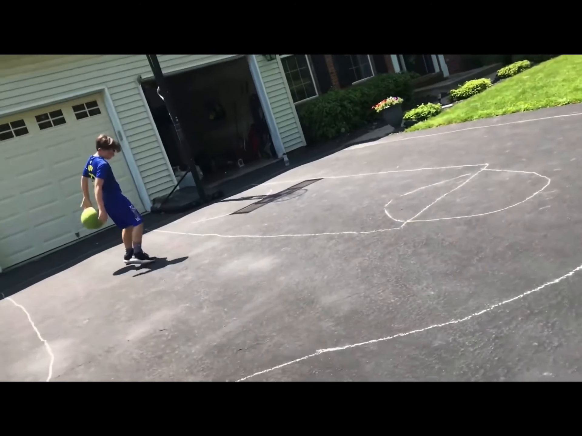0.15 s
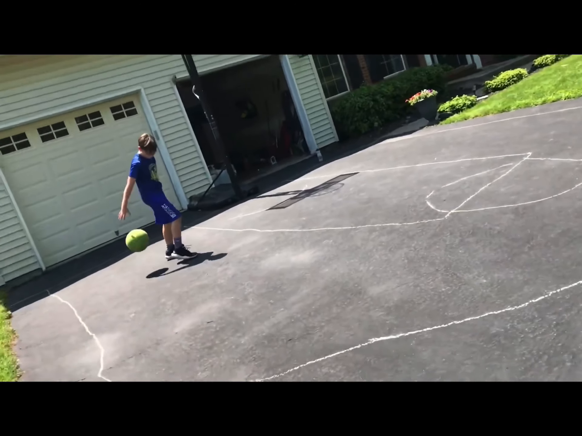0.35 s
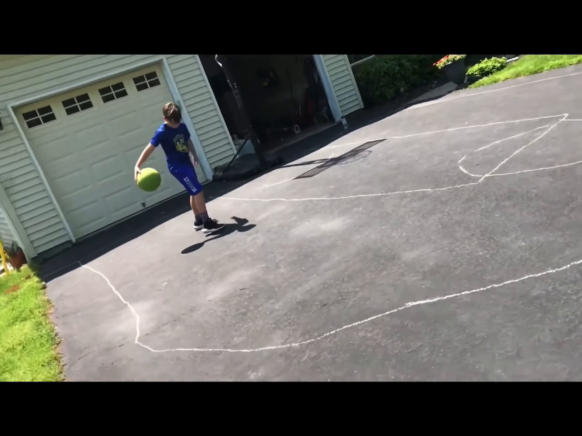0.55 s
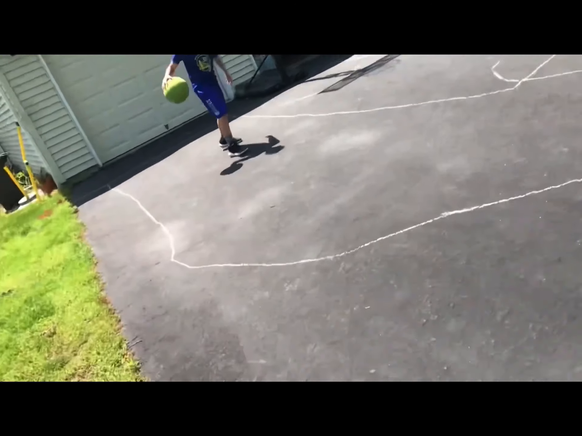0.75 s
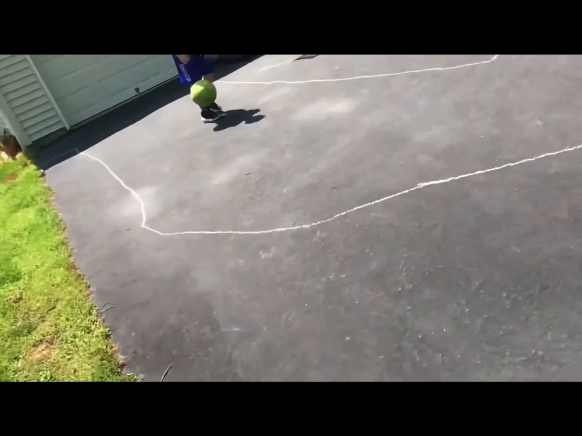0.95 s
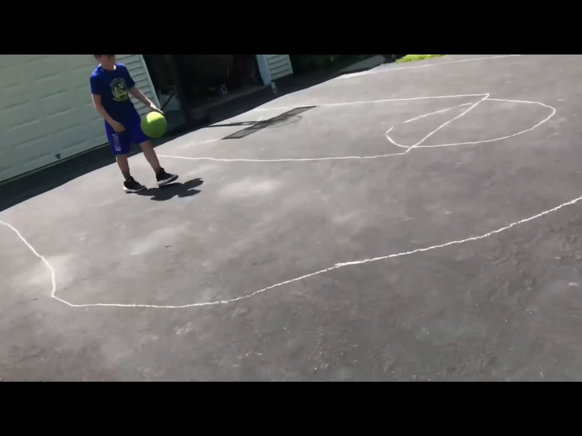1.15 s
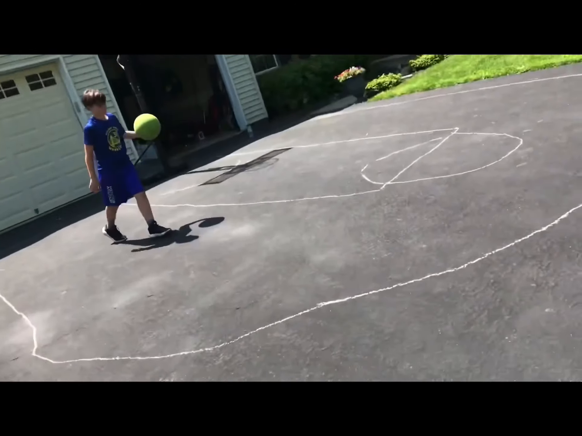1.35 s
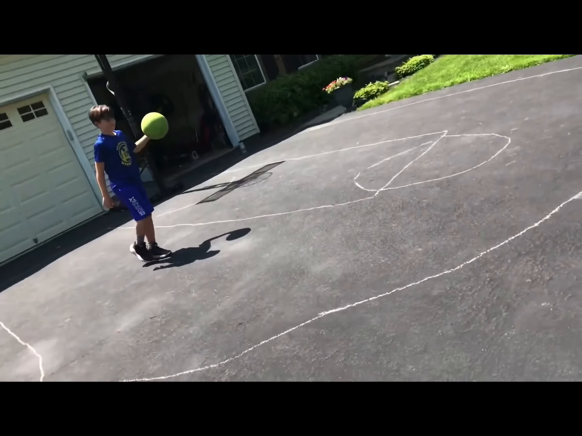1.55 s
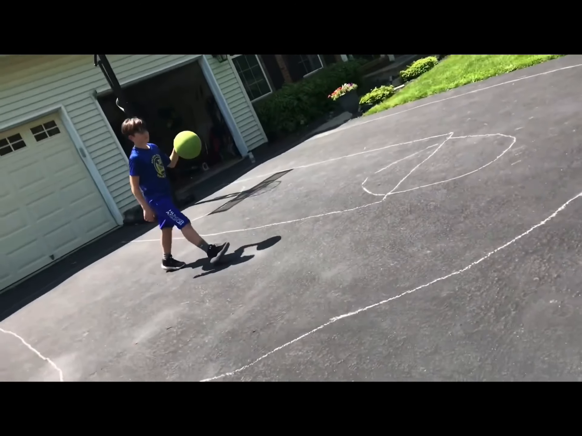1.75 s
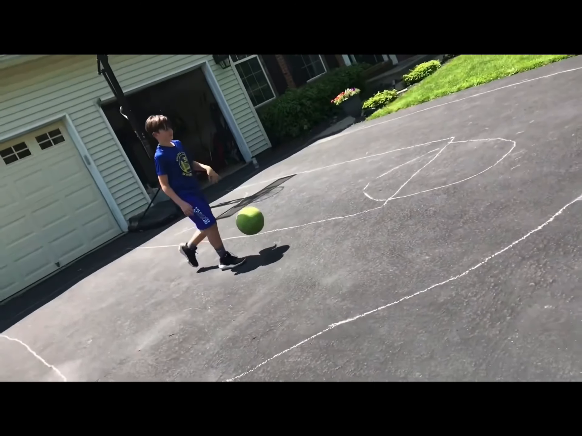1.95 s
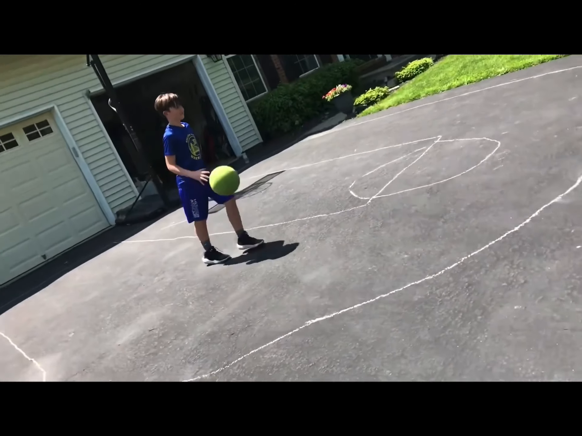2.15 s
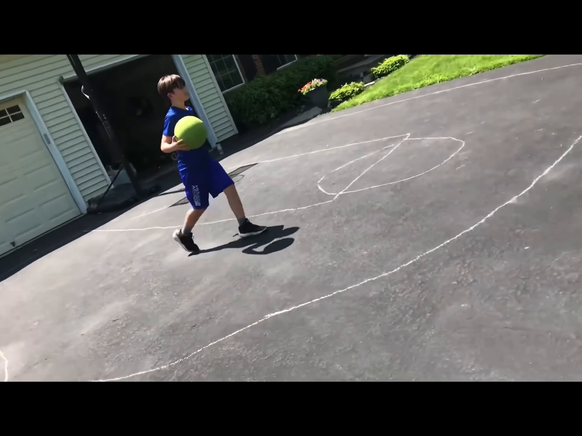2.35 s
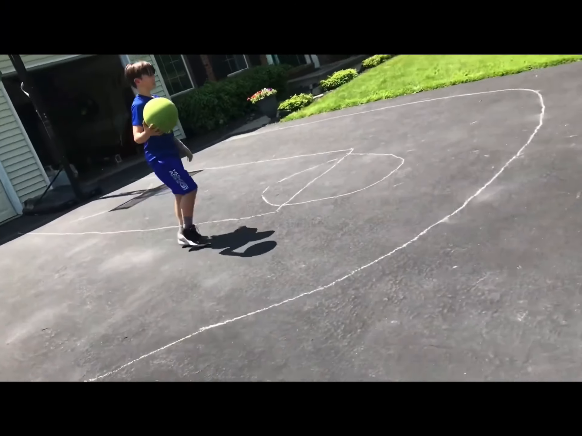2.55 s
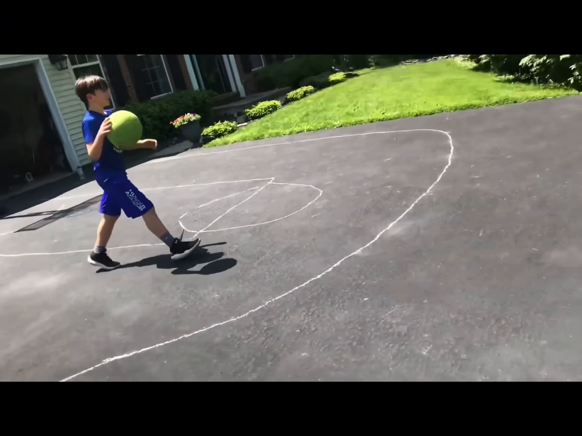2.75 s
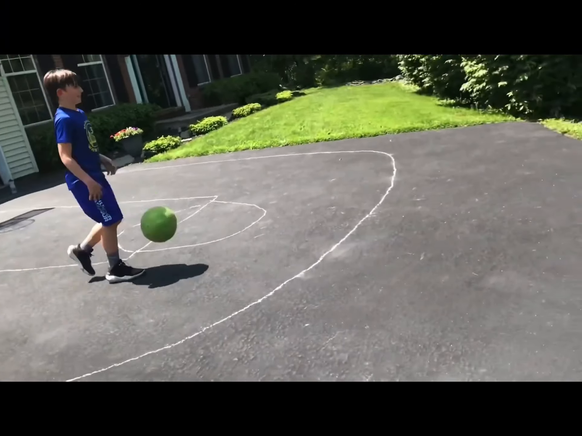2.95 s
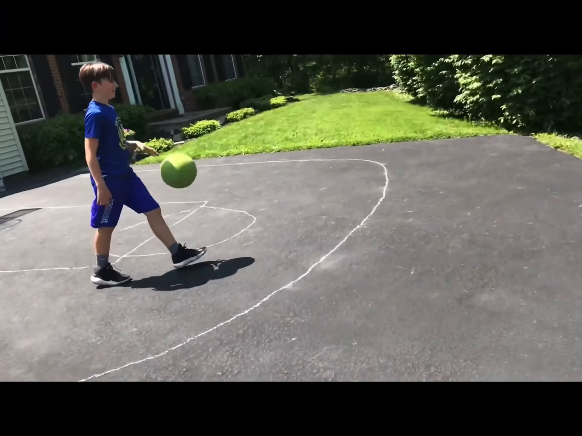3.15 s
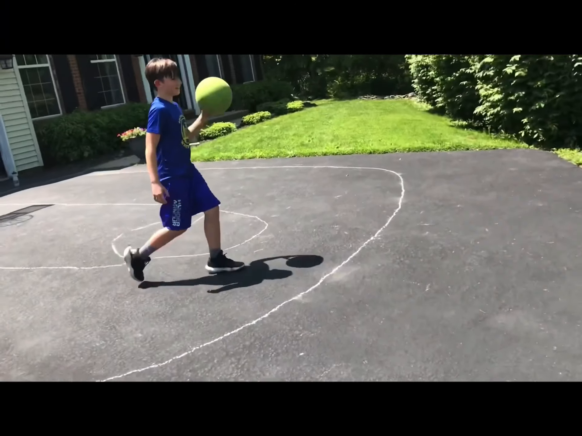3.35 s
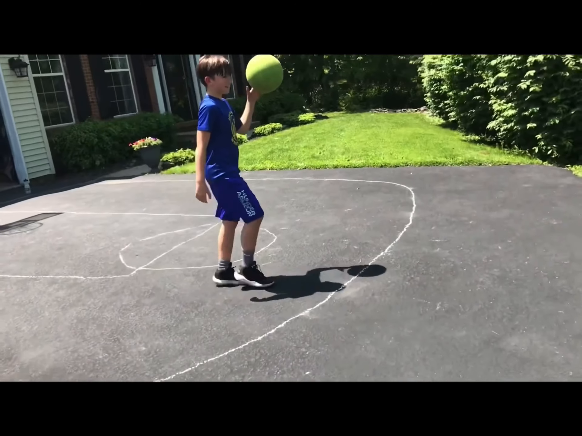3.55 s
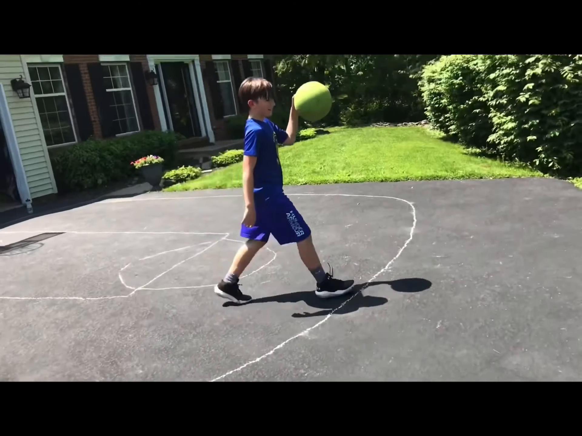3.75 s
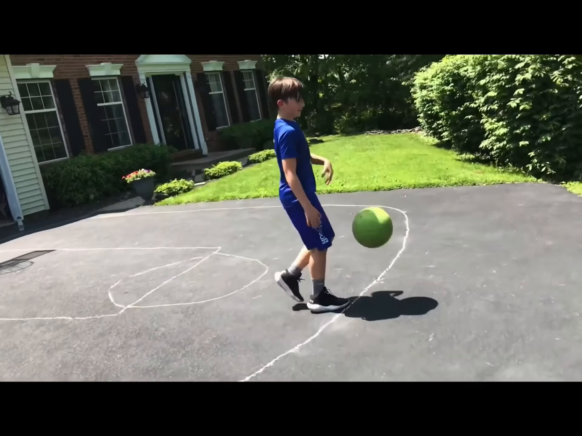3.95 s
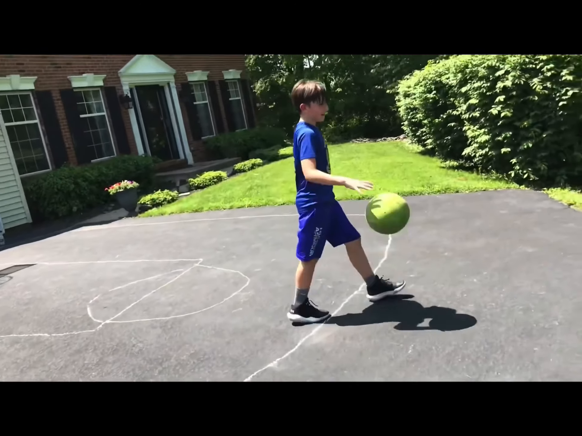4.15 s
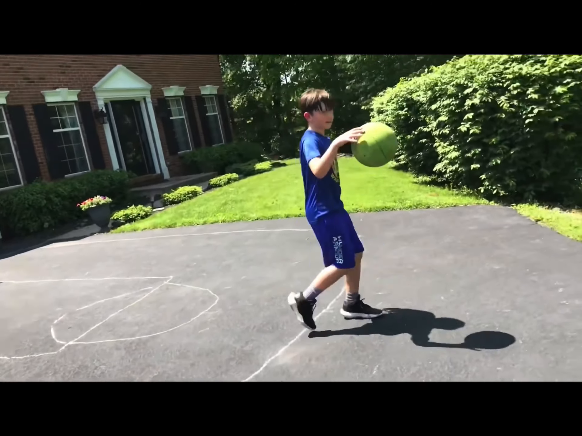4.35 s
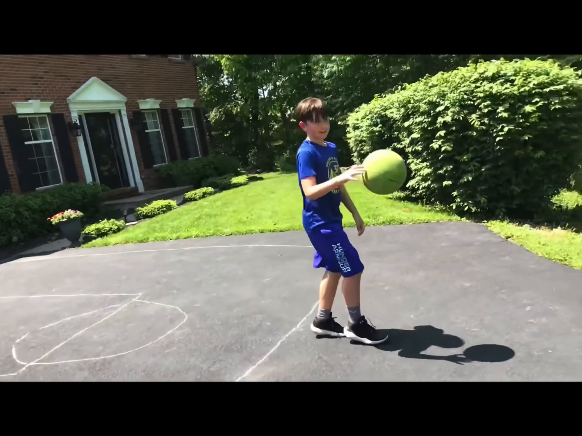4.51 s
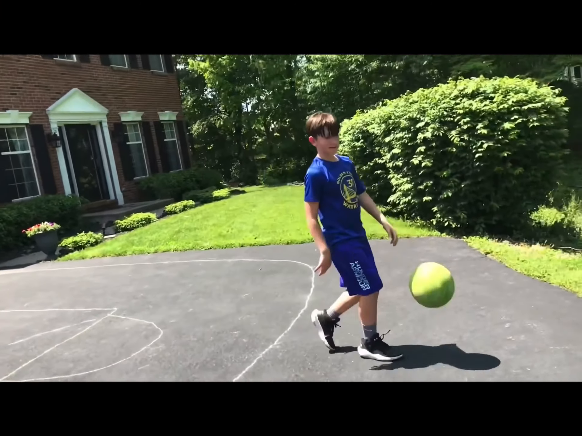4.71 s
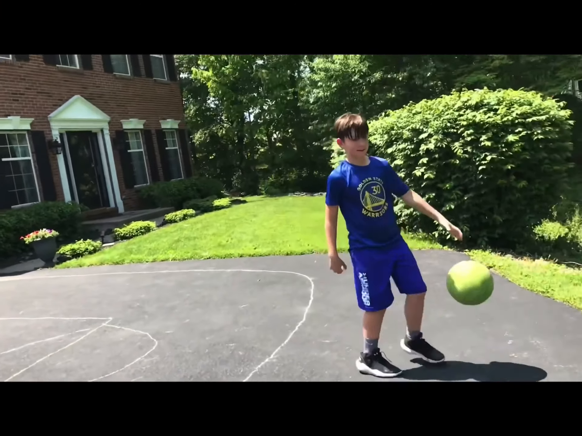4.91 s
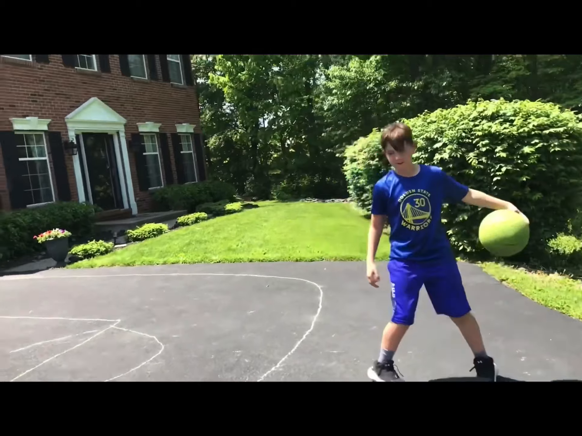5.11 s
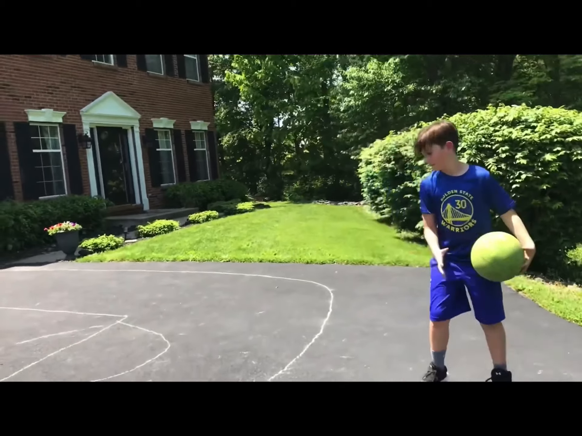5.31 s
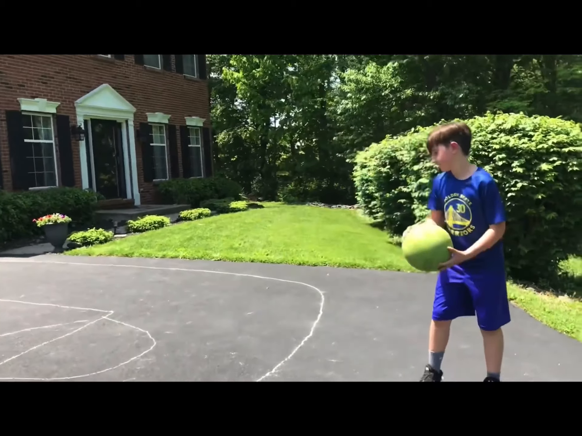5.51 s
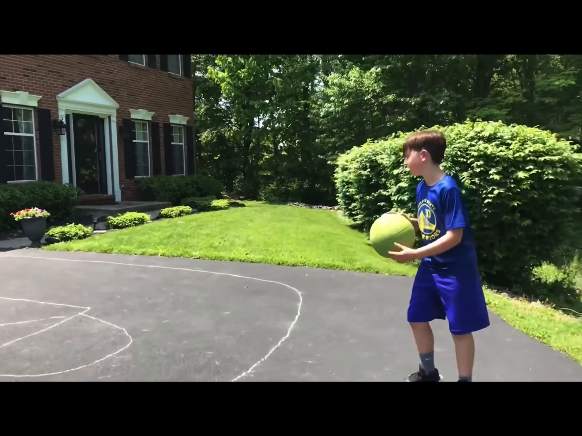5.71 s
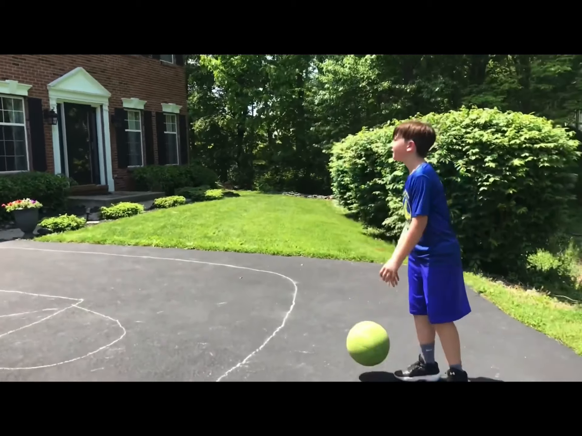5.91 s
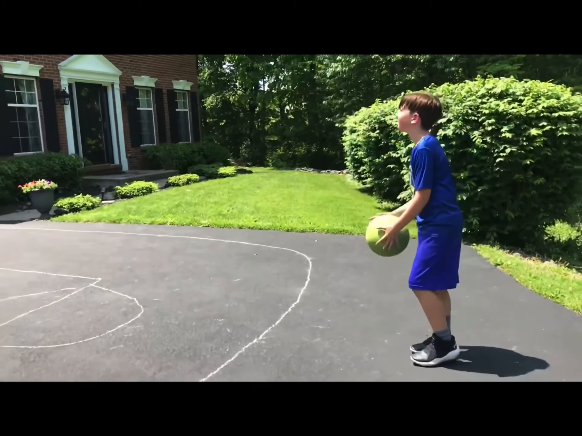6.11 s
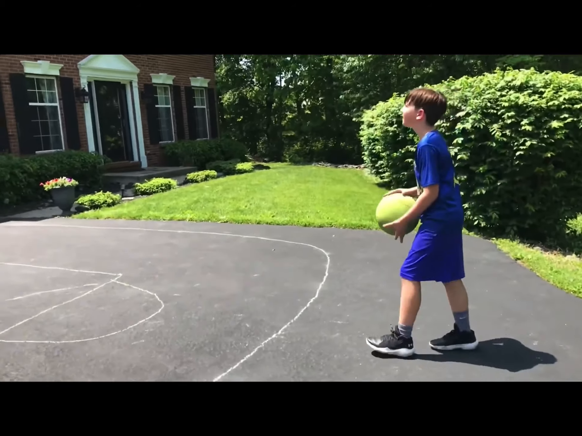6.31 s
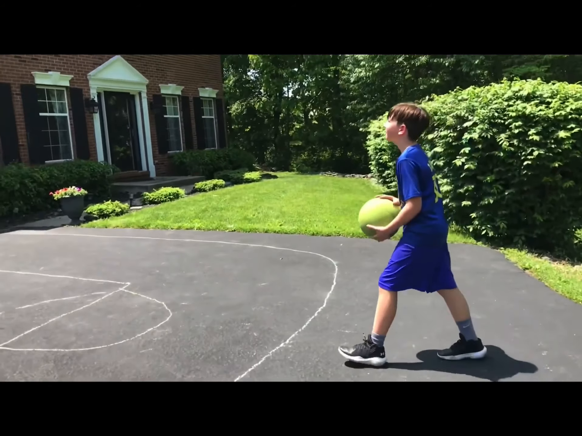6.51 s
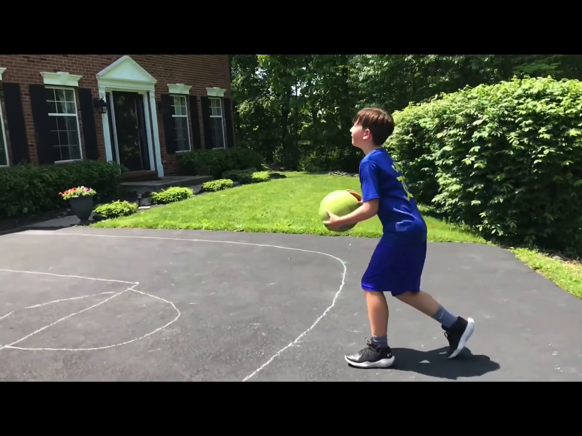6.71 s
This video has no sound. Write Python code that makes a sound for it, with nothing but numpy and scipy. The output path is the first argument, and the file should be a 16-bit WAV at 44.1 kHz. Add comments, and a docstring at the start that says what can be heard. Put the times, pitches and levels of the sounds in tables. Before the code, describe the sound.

A child dribbles a rubber ball on an asphalt driveway, walking toward a hand-held phone. Seven springy bounces, roughly a second apart, start soft and grow louder, each a deep thump with a hollow ping and gritty slap, echoing off walls. Between them come dull shoe thuds, small clicks, brushing and palm touches. Faint bird slurs, low outdoor rumble, leaf hiss and a weak hum lie behind.

```python
"""First heard is a rubber ball, dribbled by a child over asphalt and coming closer to a hand-held phone.
Each bounce sums a modal thump of the squashed ball, a ping of its air and shell and a noise crack of the grit.
Garage and house return delayed echoes; the yard scatters a diffuse tail of decaying noise bands.
Between bounces: palms ring the ball, soles and hands thud, click and brush, and air puffs buffet the microphone.
Behind lie a songbird's gliding tone, a faint machine hum and the filtered noise of outdoor rumble and hiss."""
import sys
import numpy as np
from scipy import signal
from scipy.fft import rfft, irfft, next_fast_len
from scipy.io import wavfile

SR = 44100
rng = np.random.default_rng(int(sys.argv[2]) if len(sys.argv) > 2 else 0)


def int16_out(signal):
    """Quantize to a 16-bit WAV file."""
    q = np.round(np.clip(np.atleast_2d(signal).T, -1, 1) * 32767)
    wavfile.write(sys.argv[1], SR, q.astype(np.int16))


N = 298545
SIZE = 16384  # samples in one short sound
AGE = np.arange(SIZE) / SR  # s since its onset
TIME = np.arange(N) / SR  # s since the start of the scene


def amp(db):
    """Level to gain: 20 dB is a factor of ten in amplitude."""
    return 10 ** (np.asarray(db) / 20)


def peak(x, db):
    """Peak normalisation to a level in dB."""
    return x * amp(db) / np.abs(x).max()


def unit(x):
    """Power normalisation to an rms of 1."""
    return x / np.sqrt(np.mean(x ** 2))


def add(track, s, x):
    """Superposition: mix a sound in at a time in s."""
    start = max(0, int(round(s * SR)))
    track[start:start + len(x)] += x[:N - start]


def fade(t60, age=AGE):
    """Exponential decay, falling 60 dB in t60 seconds."""
    return np.exp(-np.log(1000) * age / t60)


def noise(size=SIZE):
    """White noise: equal mean power at all frequencies."""
    return rng.standard_normal(size)


def butter(x, hz, kind, order):
    """Maximally flat filtering: low-pass, high-pass or band-pass."""
    return signal.sosfilt(signal.butter(order, hz, kind, fs=SR, output="sos"), x)


def band(x, hz, octaves):
    """Gentle band-pass filtering about a centre frequency."""
    edges = np.clip([hz / 2 ** (octaves / 2), hz * 2 ** (octaves / 2)], 1, SR / 2 - 1)
    return butter(x, edges, "band", order=2)


def colour(x, points):
    """Minimum-phase filtering through (frequency [Hz], gain [dB]) points."""
    size = next_fast_len(len(x) + SIZE, True) // 2 * 2
    hz, db = np.transpose(points)
    bins = np.maximum(np.fft.rfftfreq(size, 1 / SR), 1)
    cepstrum = irfft(np.log(amp(np.interp(np.log(bins), np.log(hz), db))))
    # folding the cepstrum onto positive times makes the filter causal
    cepstrum[1:size // 2] *= 2
    cepstrum[size // 2 + 1:] = 0
    return irfft(rfft(x, size) * np.exp(rfft(cepstrum)))[:len(x)]


def walk(rate):
    """Random modulation: smooth drift of rms 1 through `rate` random values per second."""
    knots = noise(int(N / SR * rate) + 2)
    return unit(np.interp(TIME * rate, np.arange(len(knots)), knots))


def ring(modes, scatter_db=3.0):
    """Modal superposition: damped sines of alternating sign, a little different at every blow."""
    total = 0
    for k, (hz, db, t60) in enumerate(modes):
        level_chance, pitch_chance = rng.standard_normal(2)
        tone = np.sin(2 * np.pi * hz * (1 + 0.013 * pitch_chance) * AGE)
        total = total + (-1) ** k * amp(db + scatter_db * level_chance) * fade(t60) * tone
    return total


def swell(grains, length, db):
    """Amplitude modulation: noise of a given rms level rises and falls once, as a half-sine."""
    return amp(db) * unit(grains) * np.sin(np.pi * np.minimum(AGE / length, 1))


# Bounces of the ball: (time [s], thump peak [dB], gain of thump modes above the main one [dB],
# ping peak [dB], favoured ping frequency [Hz], lift-off gain [dB], relative crack level [dB],
# crack tilt [dB per octave], gain of yard tail and after-ring [dB])
DRIBBLED_BOUNCES = [(0.389, -17.3, -2.5, -27.5, 900, -0.5, -15.5, -1, -3),
                    (1.0762, -16.2, 3, -17, 910, -4.5, -13, -0.9, 0),
                    (2.0753, -13, 4, -13.5, 1070, -26, -12, 1.7, 1),
                    (3.0770, -12, 3.5, -16, 1200, -7, -11, -0.2, 4),
                    (4.0990, -9, 3, -14.5, 1130, -5.5, -5.5, -0.1, 7.5),
                    (4.8757, -11, 9, -13.5, 1060, -5, -16, 1.1, -0.5),
                    (6.0174, -13, -3, -13.5, 840, -7.5, -15, 2.6, -3.5)]
# Spectrum a bounce radiates in all directions together: (frequency [Hz], gain [dB])
RADIATED_SPECTRUM = [(30, -8), (60, 34), (110, 28), (200, 21.5), (450, 8), (1100, 16.5), (1800, 5.5),
                     (2700, 6), (5000, -1.5), (7000, -8), (16000, -22.5)]
CONTACT_S, CONTACT_S_PER_DB = .0098, .0001  # a blow that shakes the shell harder leaves the ground sooner


def dribble():
    """Superposition of direct sound, after-ring, wall reflections and diffuse yard tail at every bounce."""
    out = np.zeros(N)
    radiated = colour(signal.unit_impulse(SIZE), RADIATED_SPECTRUM)
    for s, thump_db, wobble_db, ping_db, ping_hz, lift_db, crack_db, tilt_db, tail_db in DRIBBLED_BOUNCES:
        contact_s = CONTACT_S - CONTACT_S_PER_DB * wobble_db
        sound = bounce(contact_s, thump_db, wobble_db, ping_db, ping_hz, lift_db, crack_db, tilt_db)
        add(out, s, sound)
        add(out, s, after_ring(tail_db))
        add(out, s, amp(tail_db) * yard(radiated))
        out += echoes(s, sound)
    return out


# Deep modes of the squashed ball: (nominal frequency [Hz], relative level [dB], t60 [s])
SQUASHED_MODES = [(154.3, 0, 0.059), (70.6, -7, 0.051), (203.5, -12.5, 0.05), (273.5, -8, 0.07),
                  (321.4, -14, 0.08)]
# Air and shell modes of the ball at a bounce: (nominal frequency [Hz], relative level [dB], t60 [s])
BALL_MODES = [(348, -7, 0.12), (588, -13, 0.058), (653, 3, 0.037), (757, 1, 0.033), (886, -3.5, 0.04),
              (927, -4, 0.05), (1022, -3, 0.029), (1153.6, -1, 0.047), (1274, 4, 0.02), (1343, -2, 0.027),
              (1476, -2, 0.025), (1774, -16.5, 0.085), (2265, -21, 0.0486), (2760, -3, 0.0162),
              (2806, -9.5, 0.0209)]
# Spectrum of rubber slapping asphalt, before tilt: (frequency [Hz], gain [dB])
CRACK_SPECTRUM = [(200, -16), (380, 3.5), (900, 4), (1400, 1.5), (1900, -4), (2600, 7), (3400, -5),
                  (5200, 1), (6200, -8.5), (7200, -9), (9700, -14.5), (12000, -11), (16000, -25)]


def bounce(contact_s, thump_db, wobble_db, ping_db, ping_hz, lift_db, crack_db, tilt_db):
    """Impact excitation: a brief contact force drives the ball's modes, while rubber slaps the grit."""
    squash = np.cos(np.pi * AGE / contact_s) * (AGE < contact_s)  # rate of change of a half-sine force
    # a slanting blow stirs the modes above the main one
    main_hz = SQUASHED_MODES[0][0]
    deep_modes = [(hz, db + wobble_db * (hz > main_hz), t60) for hz, db, t60 in SQUASHED_MODES]
    swing = signal.fftconvolve(squash, ring(deep_modes, scatter_db=2.0))[:SIZE]
    # the shrinking ball also draws the air in
    drawn_air = amp(-11.5) * butter(squash, 684, "low", order=2)
    # so small a source radiates little deep bass
    thump = peak(butter(peak(swing, 0) - drawn_air, 71.0, "high", order=4), thump_db)

    # the side that faces the listener favours some modes
    ping_modes = [(hz, db + 9 * np.exp(-(np.log2(hz / ping_hz) / 0.49) ** 2), t60)
                  for hz, db, t60 in BALL_MODES]
    ping = peak(ring(ping_modes, scatter_db=0.87), ping_db)

    # the contact patch spreads over the grit, with one sharp slap as the trapped air escapes
    grit = noise() * (fade(0.016) + amp(-25.5) * fade(0.19)) * np.minimum(AGE / 0.0016, 1)
    grit[int(.0007 * SR)] -= 7
    tilted = [(hz, db + tilt_db * np.log2(hz / 3000)) for hz, db in CRACK_SPECTRUM]
    crack = amp(crack_db - 31) * unit(colour(grit, tilted))

    # leaving the ground rings the ball again, and the rubber peels off softly
    lift = np.interp(AGE - 1.17 * contact_s, AGE, ping + amp(-19.5) * crack, left=0)
    return thump + ping + crack + amp(lift_db) * lift


# High ring lingering after a bounce: (frequency [Hz], level before the bounce's tail gain [dB], t60 [s])
LINGERING_TONES = [(2884, -71, 2.24), (4420, -69.5, 1.3)]


def after_ring(db):
    """Narrow-band noise: two high tones flicker as they die away."""
    age = np.arange(2 * SR) / SR
    total = 0
    for hz, level, t60 in LINGERING_TONES:
        flicker = unit(band(noise(len(age)), hz, octaves=0.011))
        total = total + amp(db + level) * flicker * fade(t60, age)
    return total


# The child walks out from the walls: (time [s], garage delay [s], garage treble gain [dB],
# house delay [s], house treble gain [dB])
WALL_DELAYS = [(.39, .019, 9, 0.075, -5), (2.08, .027, 7, 0.081, -9), (3.08, .029, 1, 0.083, -30),
               (4.101, .043, 3, 0.1, 1.5), (4.878, .046, -11, .122, -1), (6.019, .044, 4.5, 0.11, -1.5)]
GARAGE_DB, GARAGE_REF_S = -16.5, 0.021  # gain at this delay; weaker with a longer path
HOUSE_DB, HOUSE_REF_S = -16, 0.073
NEAR_WALL_S, FAR_WALL_S = .042, .18  # two more echoes, whose delays stay the same


def echoes(s, sound):
    """Specular reflection: garage and house answer later and weaker the farther the child is from them."""
    out = np.zeros(N)
    times, *columns = np.transpose(WALL_DELAYS)
    garage_s, garage_treble_db, house_s, house_treble_db = (np.interp(s, times, c) for c in columns)
    add(out, s + garage_s, wall(sound, GARAGE_DB, garage_treble_db) * GARAGE_REF_S / garage_s)
    add(out, s + house_s, wall(sound, HOUSE_DB, house_treble_db) * HOUSE_REF_S / house_s)
    add(out, s + NEAR_WALL_S, wall(sound, db=-15.0, treble_db=-10.5))
    add(out, s + FAR_WALL_S, wall(sound, db=-30.5, treble_db=-7))
    return out


def wall(sound, db, treble_db):
    """Frequency-dependent scattering: the bass returns whole, while lapped siding smears the treble."""
    short = SIZE // 16
    laps = noise(short) * fade(0.021, AGE[:short])
    treble = butter(sound, 360, "high", order=2)
    treble = signal.fftconvolve(treble, laps / np.linalg.norm(laps))[:SIZE]
    treble = colour(treble, [(1000, -3.5), (9000, -9.5)])
    return amp(db) * (butter(sound, 380, "low", order=2) + amp(treble_db) * treble)


# Octave bands of the diffuse yard tail: (centre [Hz], relative level [dB], t60 [s])
TAIL_BANDS = [(60.6, -18.5, 0.63), (111.7, -7, 0.83), (239, -11.5, 0.67), (464, -11.5, 0.78), (960, -25, 1),
              (1960, -10, 0.81), (4300, -18, 1), (8160, -11, 0.62), (16140, -12, 0.79)]


def yard(x):
    """Diffuse reverberation: hedges, trees and siding scatter noise bands that build up and decay."""
    age = np.arange(SR) / SR
    tail = 0
    for hz, db, t60 in TAIL_BANDS:
        build_up = 1 - np.exp(-age / 0.0028)
        tail = tail + amp(db - 37.5) * band(noise(SR), hz, 1) * fade(t60, age) * build_up
    return signal.fftconvolve(x, tail)[:N]


def player():
    """Reverberant superposition: the child's hands and shoes, with the yard's tail."""
    out = palms() + thuds_clicks_brushes()
    return out + amp(-9) * yard(out)


# Hands on the ball: (time [s], ring peak [dB], palm slap peak [dB])
PALM_BLOWS = [(0.595, -45, -50), (4.701, -36, -39.5), (5.442, -25.5, -30.5), (6.128, -35.5, -43),
              (6.192, -37.5, -36)]
HAND_RING = 2.54  # ring time as a multiple of a bounce's
HAND_ATTACK_S, HAND_TOP_HZ = 0.0028, 1920  # a palm lands softly and damps the high modes


def palms():
    """Soft impact excitation: a palm rings the ball, slaps its skin and pushes it with a dull thud."""
    out = np.zeros(N)
    landing = np.minimum(AGE / HAND_ATTACK_S, 1)
    modes = [(hz, level - 3 * np.log2(hz / 1000), t60 * HAND_RING) for hz, level, t60 in BALL_MODES]
    for s, db, slap_db in PALM_BLOWS:
        tone = butter(ring(modes, scatter_db=0.5), HAND_TOP_HZ, "low", order=4) * landing
        slap = band(noise(), 690, 1.3) * fade(0.08) * landing
        skin = band(noise(), 4500, 2.0) * fade(0.033) * landing
        push = swell(band(noise(), 195, 1.53), length=0.057, db=db - 14)
        add(out, s, peak(tone, db) + peak(slap, slap_db) + peak(skin, slap_db - 10.5) + push)
    return out


# Dull thuds of soles and hands, with grit or slap noise: (time [s], thud peak [dB], noise peak [dB])
DULL_THUDS = [(0.23, -45.5, -46.5), (0.312, -38.5, -48.5), (2.243, -35, -49), (2.306, -32, -48),
              (2.803, -26.5, -40.5), (3.427, -34.5, -55), (3.847, -45, -39.5), (3.866, -32, -48.5),
              (4.213, -26, -32), (4.372, -38, -39), (4.477, -33, -59), (4.544, -33.5, -43.5),
              (4.710, -30.5, -39.5), (5.079, -36.5, -44), (5.771, -41, -42), (5.861, -34, -39.5)]
THUD_HZ, THUD_REF_DB, THUD_DB_PER_OCTAVE = 218, -35, 30  # a louder thud is lower
RUMBLE_S, RUMBLE_HZ, RUMBLE_DB = 0.061, 268, -21.5  # soft rumble along with it; level relative to the thud
# Short clicks: grit snapping, or a hand touching the ball: (time [s], peak [dB], band centre [Hz])
SHORT_CLICKS = [(2.3527, -32.5, 2800), (2.7983, -32, 4170), (4.279, -40, 1950), (4.769, -33, 1770),
                (4.845, -23, 4500), (4.998, -42, 4600), (5.851, -46.5, 4100)]
KNOCK_HZ, KNOCK_DB = 1080, -11.5  # a duller knock within each click; level relative to the click
# Soles and cloth brushing: (time [s], length [s], rms level before swell and grip [dB], band centre [Hz])
BRUSHES = [(0.259, 0.042, -64.5, 7000), (1.17, 0.09, -65, 6960), (2.287, 0.081, -63, 6430),
           (3.599, 0.25, -68, 4300), (4.163, 0.11, -51, 2500), (4.618, 0.079, -60, 7600),
           (5.304, 0.2, -68.5, 10000), (5.687, 0.04, -60.5, 3930)]


def thuds_clicks_brushes():
    """Impact and friction noise: soles and hands thud, grit or hands click, soles and cloth brush."""
    out = np.zeros(N)
    for s, db, noise_db in DULL_THUDS:
        thud_hz = THUD_HZ * 2 ** ((THUD_REF_DB - db) / THUD_DB_PER_OCTAVE)
        thud = band(fade(0.012), thud_hz, 1.56)
        rough = band(noise(), 590, 2.3) * fade(0.031) * (1 - np.exp(-AGE / 0.0018))
        rumble = swell(band(noise(), RUMBLE_HZ, 1.0), RUMBLE_S, db + RUMBLE_DB)
        add(out, s, peak(thud, db) + peak(rough, noise_db) + rumble)
    for s, db, hz in SHORT_CLICKS:
        click = signal.unit_impulse(SIZE) + 0.22 * noise() * fade(0.0097)
        knock = band(click, KNOCK_HZ, 0.78)
        add(out, s, peak(band(click, hz, 0.91), db) + peak(knock, db + KNOCK_DB))
    for s, length, db, hz in BRUSHES:
        grains = noise() * amp(6.3 * noise())  # a few grains stand out
        catching = amp(2 * walk(149)[:SIZE])  # the sole grips and slips
        add(out, s, swell(band(grains, hz, 1.42), length, db) * catching)
    return out


# Air buffeting the microphone: (time [s], length [s], rms level before the swell [dB])
AIR_PUFFS = [(4.18, 0.073, -27), (4.269, 0.07, -37.5)]
BUFFET_HZ, BUFFET_RUSTLE_HZ, BUFFET_RUSTLE_DB = 73.6, 257, -12  # rustle level relative to the bump


def buffets():
    """Flow noise: each puff of air makes a deep bump with a dull rustle on top."""
    out = np.zeros(N)
    for s, length, db in AIR_PUFFS:
        add(out, s, swell(band(noise(), BUFFET_HZ, 1.28), length, db))
        add(out, s, swell(band(noise(), BUFFET_RUSTLE_HZ, 0.78), length, db + BUFFET_RUSTLE_DB))
    return out


# Bird slurs: (time of the dip [s], fall time [s], dip frequency [Hz], top frequency [Hz],
# final sag in frequency [Hz], relative level [dB])
BIRD_SLURS = [(.14, .065, 2440, 3104, 50, -57.5), (0.916, 0.063, 2950, 4520, 703, -56.5),
              (2.455, .005, 2800, 4405, 30, -51.5), (3.425, .055, 2780, 4000, 302, -67)]
SLUR_START = 1.5  # a slur begins above its later top: height, where the dip is 0 and the top is 1
SLUR_RISE_S, SLUR_HOLD_S, SLUR_RELEASE_S = 0.041, 0.032, 0.027
SLUR_DIP_DB = -3  # per unit of height lost


def bird():
    """Frequency modulation: a distant songbird slurs down and up, softer in the dip, smeared by the trees."""
    out = np.zeros(N)
    for s, fall_s, dip_hz, top_hz, sag_hz, db in BIRD_SLURS:
        height = np.interp(TIME - s, [-fall_s, 0, SLUR_RISE_S], [SLUR_START, 0, 1])
        sag = sag_hz * np.clip((TIME - s - SLUR_RISE_S) / SLUR_RELEASE_S, 0, 1)
        pitch = (dip_hz + (top_hz - dip_hz) * height - sag) * (1 + 0.012 * walk(280))
        edges = s - fall_s + np.cumsum([0, .01, fall_s + SLUR_RISE_S + SLUR_HOLD_S, SLUR_RELEASE_S])
        gate = np.interp(TIME, edges, [0, 1, 1, 0])
        level = amp(db + SLUR_DIP_DB * (SLUR_START - height))
        out += gate * level * np.sin(2 * np.pi * np.cumsum(pitch) / SR)
    leaves = noise() * fade(0.05)
    smeared = signal.fftconvolve(out, leaves / np.linalg.norm(leaves))[:N]
    return amp(-8.5) * smeared + amp(7) * yard(out)


# Spectral shape of the outdoor background: (frequency [Hz], gain [dB])
OUTDOOR_SPECTRUM = [(25, -41.5), (50, -3), (108, -2), (145, -9.5), (200, -12), (280, -15), (480, -29),
                    (750, -30.5), (1370, -32.5), (2000, -39), (3200, -44), (5200, -45), (7000, -51.5),
                    (16000, -57)]
# Course of the background, about which it wavers: (time [s], rumble level [dB], hiss level [dB])
AIR_LEVELS = [(0, -52, -57.5), (.8, -51, -60.5), (4.0, -52, -59.5), (5.3, -48, -57.5), (5.8, -52, -60.5)]
HUM_HZ, HUM_DB = 579.6, -64.5
HUM_DROP_DB, HUM_DROP_S, HUM_DROP_LENGTH_S = -7.5, 3.2, 2.6  # the hum sinks as the phone turns away


def outdoors():
    """Filtered noise and a wandering sine: wavering rumble, smooth leaf hiss and a far machine's hum."""
    low = butter(colour(noise(N), OUTDOOR_SPECTRUM), 320, "low", order=2)
    high = butter(colour(noise(N), OUTDOOR_SPECTRUM), 311, "high", order=2)
    s, rumble_db, hiss_db = np.transpose(AIR_LEVELS)
    rumble = unit(low) * amp(np.interp(TIME, s, rumble_db) + 1.2 * walk(9))
    hiss = unit(high) * amp(np.interp(TIME, s, hiss_db) + .5 * walk(4.5))
    hum = np.sin(2 * np.pi * np.cumsum(HUM_HZ * (1 + 0.00825 * walk(40))) / SR)
    turned = np.clip((TIME - HUM_DROP_S) / HUM_DROP_LENGTH_S, 0, 1)
    return rumble + hiss + hum * amp(HUM_DB + HUM_DROP_DB * turned + 2 * walk(15))


def scene():
    """Linear superposition of everything on the driveway, in one channel."""
    return (dribble() + player() + buffets() + bird() + outdoors())[None]


TOP_HZ = 15600


def record(dry):
    """Band limiting: the phone drops the deepest bass and cuts the top steeply."""
    without_bass = butter(dry, 11, "high", order=1)
    return signal.sosfilt(signal.ellip(8, .2, 80, TOP_HZ, fs=SR, output="sos"), without_bass)


dry = scene()
out = record(dry)
int16_out(out)
```